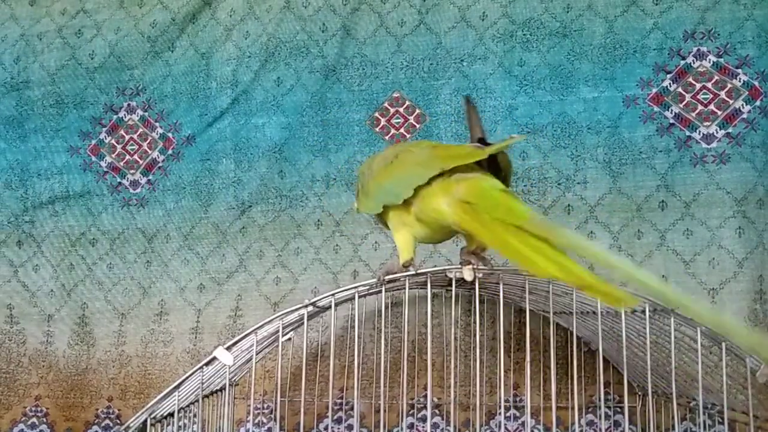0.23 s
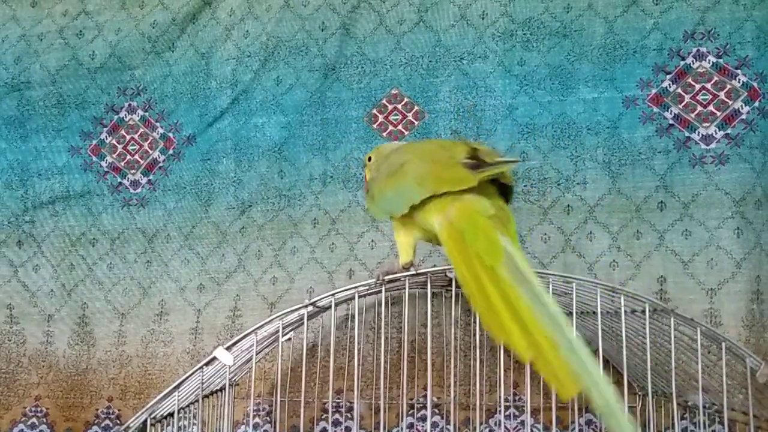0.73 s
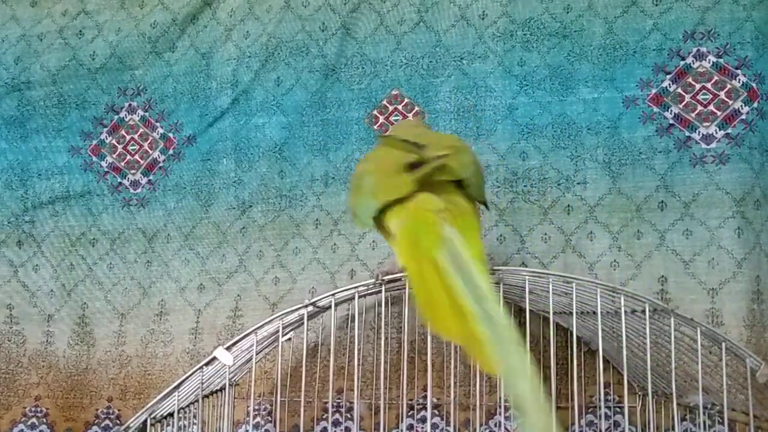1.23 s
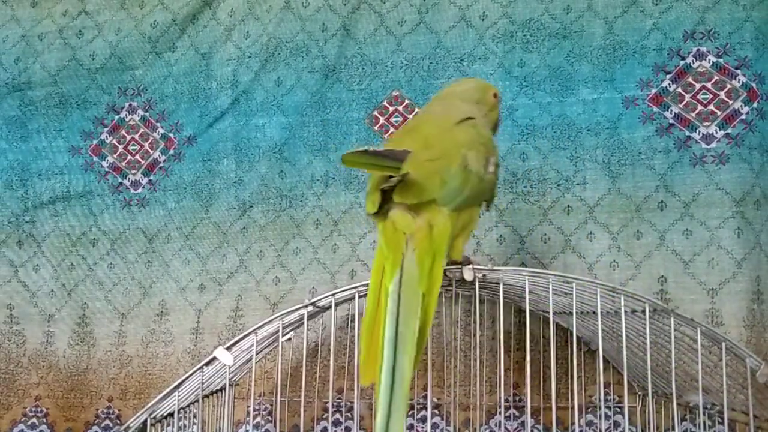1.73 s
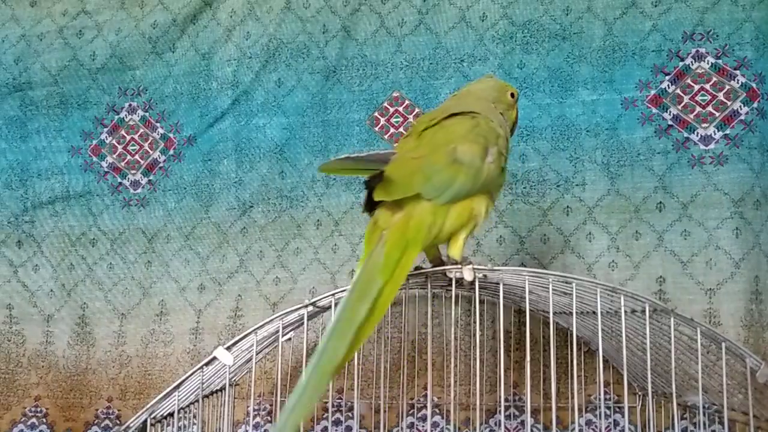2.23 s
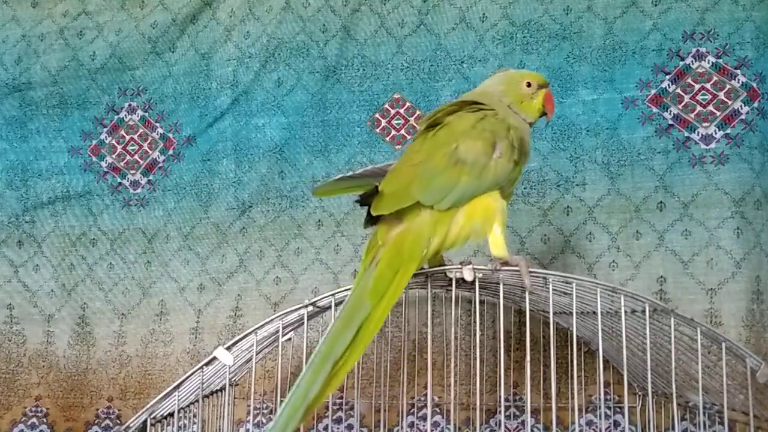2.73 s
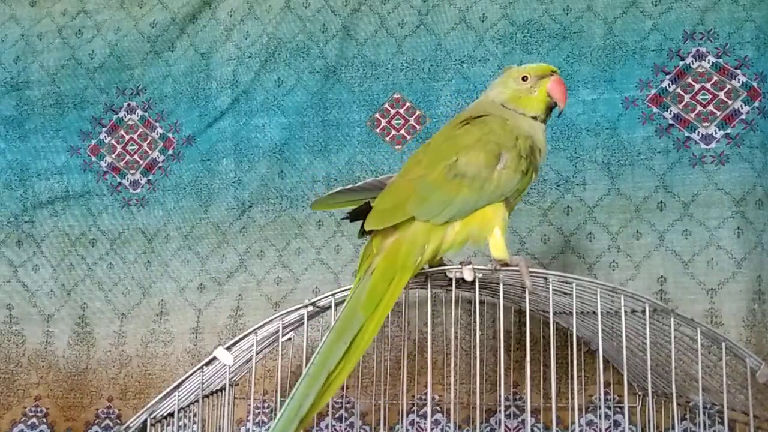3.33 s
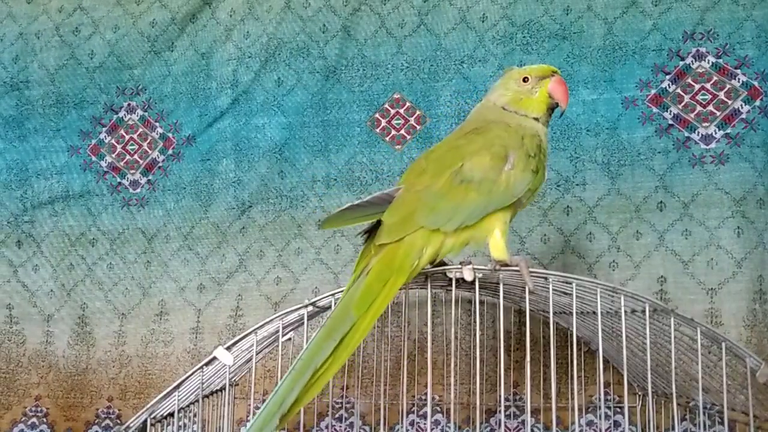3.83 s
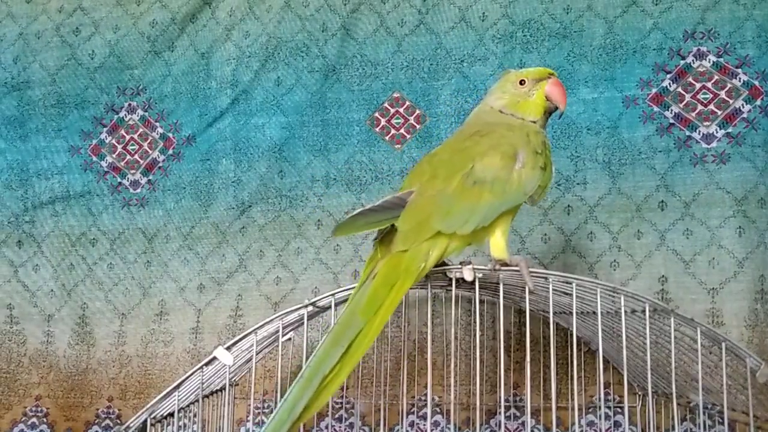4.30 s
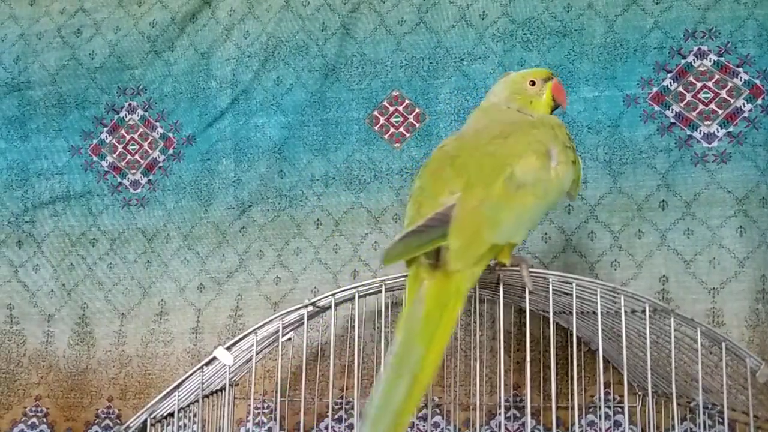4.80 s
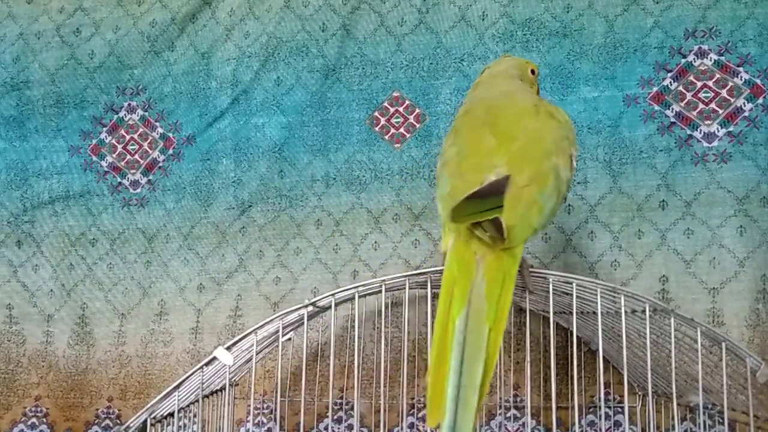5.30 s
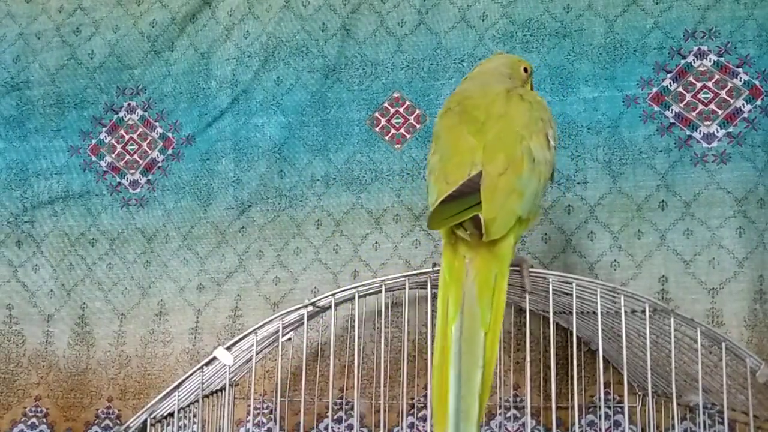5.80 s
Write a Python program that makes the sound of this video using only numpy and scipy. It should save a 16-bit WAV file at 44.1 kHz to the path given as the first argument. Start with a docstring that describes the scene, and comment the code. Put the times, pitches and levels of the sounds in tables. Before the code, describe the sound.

A parakeet close to the microphone gives four short, shrill whistled calls in a small room, some breaking into a buzz or rasp. The first two come a second apart. In the pause that follows, a small bird chirps faintly far off and the parakeet shuffles softly on its cage. A third call, a faint falling squeak and a raspier fourth call follow. An appliance hums quietly throughout.

```python
"""A small room, a camera microphone close to a parakeet on top of its cage. An appliance hums throughout.
At 1 s and 2 s the parakeet calls: shrill whistles that its membranes break into a buzz or a rasp.
From 2.7 s a small bird chirps faintly far off, and the parakeet shuffles its feet and feathers.
It calls again at 4.1 s, turns round with a faint squeak at 5 s and gives a fourth call at 5.6 s.
The camera's gain control flattens each call and ducks the hum under it."""
import sys
import numpy as np
from scipy import signal
from scipy.fft import rfft, irfft, next_fast_len
from scipy.io import wavfile
from scipy.ndimage import uniform_filter1d, minimum_filter1d, map_coordinates

SR = 44100
rng = np.random.default_rng(int(sys.argv[2]) if len(sys.argv) > 2 else 0)


def master_out(mix):
    """Clip the mix to full scale and print it as 16-bit PCM to the path in sys.argv[1]."""
    frames = np.transpose(np.atleast_2d(mix))
    ceiling = np.clip(frames, -1, 1)
    pcm = np.round(ceiling * 32767).astype(np.int16)
    wavfile.write(sys.argv[1], SR, pcm)


N = 266849
TIME = np.arange(N) / SR

# lines of the appliance's hum: pitch_hz, level_db
HUM_LINES = [(100, -69.5), (135, -69.5), (155, -70.5), (200, -69.5), (300, -79.5), (400, -61.5),
             (450, -65.5), (800, -79.5), (900, -76), (1200, -75), (1300, -72.5)]
# spectrum of the dull room tone: frequency_hz, relative_db
ROOM_TONE_SPECTRUM = [(25, -26), (60, -8), (110, -1), (170, 3.5), (265, -7), (350, 5.5), (450, 3.5),
                      (590, -4.5), (730, -4), (950, -6.5), (1350, -8), (1500, -15), (1720, -12.5)]
# spectrum of the hiss: frequency_hz, relative_db
HISS_SPECTRUM = [(1500, -7.5), (2400, 0), (3200, -6.5), (5000, -9), (7500, -8), (8000, 7.5), (8500, -13.5),
                 (10500, -14), (11700, -1), (13500, -15), (15500, -10.5)]
# the soft rising note before each call: length_s, top_pitch_hz, level_db, rasp_db
CALL_LEAD_INS = [(.024, 4100, -26.5, -34.5), (.038, 3950, -32.5, -33.5), (.019, 3330, -30, -21),
                 (.006, 3220, -38, -32.5)]
# the course of each call, a list of points apiece: time_s, pitch_hz, second_harmonic_db (re the whistle)
CALL_CONTOURS = [
    [(0.955, 3107, -27.5), (0.965, 3125, -23), (0.99, 3294, -29.5), (1.04, 3329, -32), (1.098, 3285, -28.5),
     (1.122, 3233, -24.5), (1.156, 3292, -26.5), (1.176, 3472, -23)],
    [(1.996, 3129, -21.5), (2.01, 3135, -25), (2.032, 3280, -19), (2.056, 3304, -21), (2.112, 3397, -17),
     (2.145, 3455, -30.5), (2.162, 3570, -24.5)],
    [(4.128, 3006, -24), (4.155, 3129, -17.5), (4.18, 3235, -28), (4.203, 3406, -25.5), (4.24, 3361, -34.5),
     (4.272, 3276, -24), (4.289, 3273, -26)],
    [(5.615, 3241, -18.5), (5.645, 3592, -12.5), (5.68, 3702, -28), (5.708, 3840, -22), (5.74, 3657, -14),
     (5.785, 3643, -14.5), (5.835, 3543, -25), (5.885, 3450, -25)],
]
# how each call is voiced: level_db, swell_db, peak_place (0-1), attack_s, third_harmonic_db, rasp_db,
# drift (share of the pitch)
CALL_VOICINGS = [(-13, 8.5, 0.6, .009, -30.5, -46, .003), (-10, 3, 0.37, 0.011, -25.5, -42, .002),
                 (-12, 7, .78, 0.015, -35.5, -48, .0025), (-15, 7, .36, 0.0059, -40.5, -41.5, .0045)]
# stretches where the voice breaks up: start_s, length_s, buzz (0-1), rasp_db, loss_db
VOICE_BREAKS = [(1.121, .043, 0.15, -35, 5), (2.058, .05, .92, -26, 5.5), (4.175, .03, .3, -24, 1.5),
                (4.206, .027, .68, -29, 4.5), (5.724, 0.029, 0.27, -36.5, 4), (5.759, .04, .15, -25, 9),
                (5.801, .062, 0.23, -21, 4), (5.869, 0.025, 0.2, -34, 5)]
# partials of the buzz, where the membranes repeat only every fourth cycle: pitch_multiple, relative_db
BUZZ_PARTIALS = [(0.751, -20), (1.25, -17.5), (1.502, -23), (1.752, -12), (2.25, -32.5), (2.5, -26.5),
                 (2.75, -22)]
# spectrum of the air escaping in a rasp: frequency_hz, relative_db
RASP_SPECTRUM = [(400, -82), (1100, -47.5), (1750, -14), (2400, -6), (3300, -2), (4600, -6.5), (5900, -3),
                 (7200, -2.5), (8000, -10.5), (9200, -10.5), (10500, -21.5), (12500, -40), (15500, -50.5)]
# cracks where the voice jumps: start_s, length_s, start_hz, end_hz, level_db
VOICE_CRACKS = [(.941, .016, 3063, 3200, -34.5), (4.181, .005, 2520, 2245, -28),
                (4.196, .004, 2900, 2353, -20), (5.725, .005, 7540, 4900, -27),
                (5.726, .0044, 4480, 2370, -41), (5.729, .005, 4060, 3970, -7),
                (5.740, .0025, 7500, 5500, -23), (5.741, .004, 3850, 1990, -37.5),
                (5.744, .0096, 5490, 5045, -14), (5.883, .016, 2471, 1801, -39),
                (5.887, .009, 4350, 3720, -32.5)]
# echoes off nearby surfaces: nominal_delay_s, gain_db
WALL_ECHOES = [(.0031, -19.5), (.0057, -11.5), (.0094, -15), (0.0123, -24), (0.0173, -21)]
# time the room takes to fall by 60 dB: frequency_hz, decay_s
ROOM_DECAY = [(500, 0.5), (3400, 0.32), (7000, 0.33), (12000, .36)]
# the far bird's chirps, low and high: start_s, length_s, start_hz, source_level_db
FAR_CHIRPS = [(2.683, 0.12, 4380, -67), (2.732, 0.064, 5630, -65), (2.91, 0.086, 5580, -62),
              (3.108, 0.05, 5700, -70), (3.194, 0.0824, 4320, -68), (3.235, .035, 5500, -70),
              (3.378, 0.054, 5600, -68), (3.466, 0.11, 4110, -69.5), (3.652, 0.052, 5440, -67.5),
              (3.771, 0.077, 4640, -68.5), (3.941, 0.054, 5370, -70.5), (4.053, 0.062, 4490, -63.5),
              (4.977, 0.047, 4820, -74), (5.10, 0.027, 5250, -73)]
# feet, beak and feathers brushing the cage: start_s, rise_s, centre_hz, width_octaves, level_db
CAGE_SCUFFS = [(2.77, .07, 80, .38, -56), (3.60, .03, 8400, .1, -75), (3.632, .003, 4700, .15, -68),
               (3.652, .004, 8000, .25, -61), (4.97, .035, 3400, .15, -80)]
# falling tones of the squeak: start_s, length_s, start_hz, end_hz, source_level_db
SQUEAK_TONES = [(4.99, 0.062, 1205, 867, -51.5), (4.992, 0.087, 605, 428, -51),
                (4.995, 0.1, 2033, 1920, -75.5)]

LEAD_RISE_HZ_PER_S, LEAD_GROWTH_DB_PER_S, LEAD_FADE_S, LEAD_SECOND_DB = 14000, 299.5, .008, -36
JUMP_S, BREAK_EDGE_S, RELEASE_S, SILENT_DB = .0036, .0052, .021, -60.5
THIRD_RISE_S, THIRD_FADE_DB_PER_S = .014, 42  # the 3rd harmonic comes in a little late, then mellows


def amp(db):
    """Decibels to gain."""
    return 10 ** (np.asarray(db) / 20)


def unit(x):
    """Scale to rms 1."""
    return x / np.sqrt(np.mean(x ** 2) + 1e-20)


def along(points, hz):
    """Read (frequency_hz, value) points on a log axis."""
    frequencies, values = np.transpose(points)
    return np.interp(np.log(hz + 1), np.log(frequencies + 1), values)


def filtered(x, response):
    """Filter x by a gain given as a function of frequency."""
    size = next_fast_len(len(x) + 8192)
    return irfft(rfft(x, size) * response(np.fft.rfftfreq(size, 1 / SR)), size)[:len(x)]


def noise(spectrum, size=N):
    """Noise of rms 1 with a (frequency_hz, relative_db) spectrum."""
    return unit(filtered(rng.standard_normal(size), lambda hz: amp(along(spectrum, hz))))


def wobble(rate, size=N):
    """A smooth random curve, rate knots a second."""
    knots = rng.standard_normal(int(size * rate / SR) + 4)
    return map_coordinates(knots, [np.arange(size) * rate / SR])


def add(track, start_s, sound):
    """Mix a sound into the track."""
    part = track[max(round(start_s * SR), 0):][:len(sound)]
    part += sound[:len(part)]


def patchy(x, depth_db):
    """Let each region of the spectrum swell and sink on its own."""
    spectra = signal.stft(x, nperseg=2048)[2]
    field = uniform_filter1d(rng.standard_normal(spectra.shape), size=5, axis=0)
    field = unit(uniform_filter1d(field, size=5, axis=1))
    return unit(signal.istft(spectra * amp(depth_db * field), nperseg=2048)[1][:N])


def glides(rows, waver, shortest_s=0):
    """Short whistles that swell, slide from one pitch to another and fade."""
    track = np.zeros(N)
    for start_s, length_s, start_hz, end_hz, db in rows:
        progress = np.linspace(0, 1, int(max(length_s, shortest_s) * SR))
        pitch = start_hz + (end_hz - start_hz) * np.sin(progress * np.pi / 2)
        pitch *= 1 + waver * wobble(300, len(progress))
        tone = np.sqrt(2) * np.sin(2 * np.pi * np.cumsum(pitch) / SR)
        add(track, start_s, amp(db) * np.sin(np.pi * progress) * tone)
    return track


def appliance_hum(waver_db=3.0):
    """An appliance in the room: its lines drift in strength and phase."""
    hum = np.zeros(N)
    for hz, db in HUM_LINES:
        strength = amp(db + waver_db * wobble(2.9))
        hum += strength * np.sqrt(2) * np.sin(2 * np.pi * hz * TIME + .5 * wobble(2.9))
    return hum


def room_tone(air_db=-49.5, hiss_db=-84, edge_hz=1714):
    """Dull, shifting room noise at the microphone, with a trace of hiss."""
    air = patchy(noise(ROOM_TONE_SPECTRUM), depth_db=3.3)
    air = filtered(air, lambda hz: 1 / np.sqrt(1 + (hz / edge_hz) ** 110))
    return amp(air_db + .45 * wobble(17)) * air + amp(hiss_db) * noise(HISS_SPECTRUM)


def call_gesture(contour, voicing, lead_in):
    """How the muscles steer one call: lead-in, attack, swell and release, with any breaks in it."""
    times, hz, second = np.transpose(contour)
    hold_db, swell_db, peak_place, attack_s, bright_db, breathy_db, drift = voicing
    lead_s, lead_hz, lead_db, lead_rasp_db = lead_in
    start, end = times[0], times[-1]
    t = np.arange(start - lead_s - JUMP_S, end + RELEASE_S, 1 / SR)
    age = t - start
    # the lead-in climbs and grows until the voice jumps into the call
    voiced = np.clip(1 + age / JUMP_S, 0, 1)
    pitch = voiced * np.interp(t, times, hz) + (1 - voiced) * (lead_hz + LEAD_RISE_HZ_PER_S * age)
    second_db = voiced * np.interp(t, times, second) + (1 - voiced) * LEAD_SECOND_DB
    third_db = np.interp(age, [-JUMP_S, THIRD_RISE_S], [SILENT_DB, bright_db])
    third_db -= THIRD_FADE_DB_PER_S * age
    onset = start - JUMP_S / 2
    corners_s = [onset, onset + attack_s, end, end + RELEASE_S]
    level_db = np.interp(t, corners_s, [lead_db, hold_db, hold_db, SILENT_DB])
    level_db += swell_db * np.sin(np.interp(age / (end - start), [0, peak_place, 1], [0, np.pi / 2, np.pi]))
    level_db += LEAD_GROWTH_DB_PER_S * np.minimum(age, 0)
    level_db += SILENT_DB * np.clip(1 - (t - t[0]) / LEAD_FADE_S, 0, 1) ** 2
    buzz = np.zeros(len(t))
    rasp = voiced * amp(breathy_db) + (1 - voiced) * amp(lead_rasp_db)
    for start_s, length_s, break_buzz, rasp_db, loss_db in VOICE_BREAKS:
        inside = np.clip(.5 + np.minimum(t - start_s, start_s + length_s - t) / BREAK_EDGE_S, 0, 1)
        buzz += break_buzz * inside
        rasp += amp(rasp_db) * inside
        level_db -= loss_db * inside
    # muscles need a few milliseconds to follow
    curves = (pitch, level_db, second_db, third_db, buzz, rasp)
    return t, *(uniform_filter1d(curve, size=130) for curve in curves), drift


def call(pitch, level_db, second_db, third_db, buzz, rasp, drift,
         tremor=.0027, jitter=.031, flutter=.72, throb=.5, throb_hz=365, fourth_db=-65):
    """A nearly pure whistle whose membranes slip into a buzz or a rasp when pushed."""
    size = len(pitch)
    # the rougher the voice, the more its pitch and strength shake
    shake = drift * wobble(200, size) + (tremor + jitter * rasp) * wobble(1100, size)
    # a slower, unsteady vibration puts side tones close to the whistle
    slow = np.sin(2 * np.pi * np.cumsum(throb_hz * (1 + .042 * wobble(40, size))) / SR)
    strength = np.exp(np.sqrt(rasp) * (flutter * wobble(398.3, size) + throb * slow))
    phase = 2 * np.pi * np.cumsum(pitch * (1 + shake)) / SR
    whistle = np.sin(phase)
    # the overtones come from the membranes touching, so they are less steady than the whistle
    for k, db in enumerate((second_db, third_db, fourth_db), 2):
        whistle += amp(db + 2 * wobble(400, size)) * np.sin(k * phase + .4 * wobble(600, size))
    # the four-cycle pattern slips a little all the time, which makes the buzz hoarse
    slips = [rng.uniform(0, 2 * np.pi) + .6 * wobble(400, size) for _ in BUZZ_PARTIALS]
    buzz_tones = sum(amp(db) * np.sin(k * phase + slip) for (k, db), slip in zip(BUZZ_PARTIALS, slips))
    # air escapes in uneven puffs
    air = unit(noise(RASP_SPECTRUM, size) * (1 + .46 * wobble(700, size)))
    voice = np.sqrt(2) * strength * (whistle + buzz ** 2 * buzz_tones) + rasp * air
    return signal.windows.tukey(size, .03) * amp(level_db) * voice


def parakeet():
    """Four calls close to the microphone, with brief cracks where the voice jumps."""
    track = glides(VOICE_CRACKS, waver=.008, shortest_s=.003)
    for contour, voicing, lead_in in zip(CALL_CONTOURS, CALL_VOICINGS, CALL_LEAD_INS):
        t, *gesture = call_gesture(contour, voicing, lead_in)
        add(track, t[0], call(*gesture))
    return track


def walls(x):
    """Early echoes off nearby surfaces, which beat against the gliding whistle."""
    echoes = np.zeros(N)
    for delay_s, db in WALL_ECHOES:
        add(echoes, delay_s * rng.uniform(.9, 1.1), amp(db) * x)
    return echoes


def room(x, gap_s=.004):
    """The small room's answer: a diffuse tail in which the treble dies first."""
    hz, t, spectra = signal.stft(rng.standard_normal(int(.8 * SR)), SR, nperseg=256)
    decay = amp(-60 * t / along(ROOM_DECAY, hz)[:, None])
    tail = signal.istft(spectra * decay, SR, nperseg=256)[1]
    tail = np.pad(tail / np.linalg.norm(tail), (int(gap_s * SR), 0))
    return signal.fftconvolve(x, tail)[:N]


def far_bird(rise_hz_per_s=12500):
    """A small bird far off: its chirps all sweep upward at the same average rate."""
    sweeps = [(start_s, length_s, hz, hz + rise_hz_per_s * length_s, db)
              for start_s, length_s, hz, db in FAR_CHIRPS]
    return glides(sweeps, waver=.025)


def shuffles():
    """The parakeet brushes its cage, close by: bands of noise that swell quickly and die away."""
    track = np.zeros(N)
    t = np.arange(SR // 2) / SR
    for start_s, rise_s, centre_hz, octaves, db in CAGE_SCUFFS:
        white = rng.standard_normal(len(t))
        scuff = filtered(white, lambda hz: np.exp(-.5 * (np.log2((hz + 1) / centre_hz) / octaves) ** 2))
        envelope = t / rise_s * np.exp(1 - t / rise_s)
        add(track, start_s, amp(db) * unit(scuff) * envelope)
    return track


def squeak():
    """A faint falling squeak as the bird turns round."""
    return glides(SQUEAK_TONES, waver=.04)


def scene():
    """At the microphone the parakeet is close and fairly dry; far bird and squeak are mostly room."""
    near = parakeet() + shuffles()
    turning = squeak()
    sound = near + walls(near) + amp(-13.5) * room(near) + appliance_hum() + room_tone()
    faint = turning + far_bird()
    return (sound + amp(-4) * faint + amp(.5) * room(faint))[None]


def gain_control(x, ceiling_db=-14.5, split_hz=1800, bass_ducking=1.7):
    """Turns everything down while the short-term level is over the ceiling, the low band most."""
    level = np.sqrt(np.abs(uniform_filter1d(x ** 2, size=400)) + 1e-12)
    needed = np.minimum(1, amp(ceiling_db) / level)
    gain = uniform_filter1d(minimum_filter1d(needed, size=400), size=400)
    low = filtered(x, lambda hz: 1 / (1 + (hz / split_hz) ** 24))
    return (x - low) * gain + low * gain ** bass_ducking


def record(dry, top_hz=15700):
    """The camera's mono microphone goes through gain control, then a band limit."""
    return filtered(gain_control(dry[0]), lambda hz: hz < top_hz)[None]


dry = scene()
out = record(dry)
master_out(out)
```